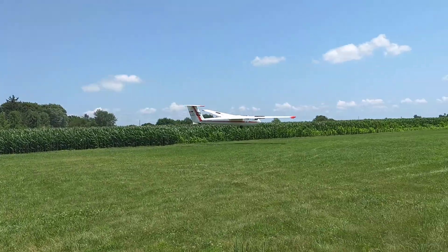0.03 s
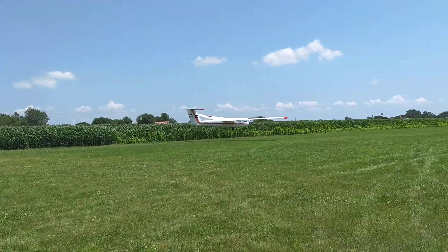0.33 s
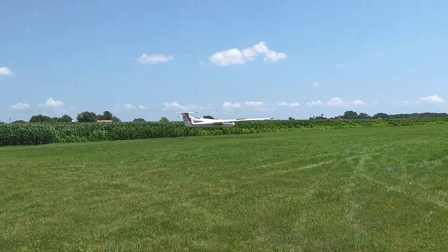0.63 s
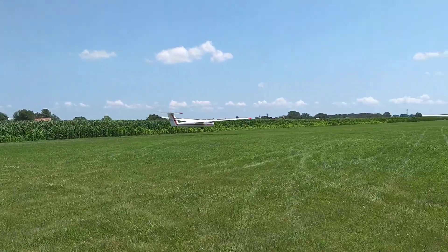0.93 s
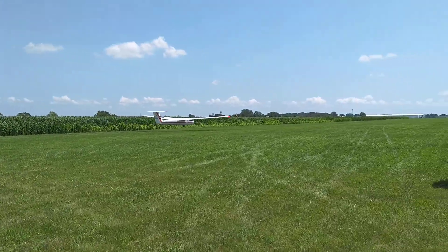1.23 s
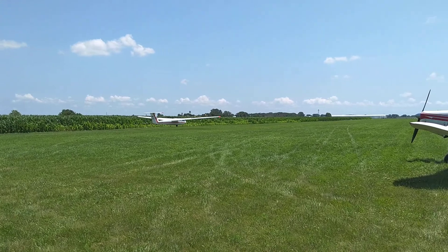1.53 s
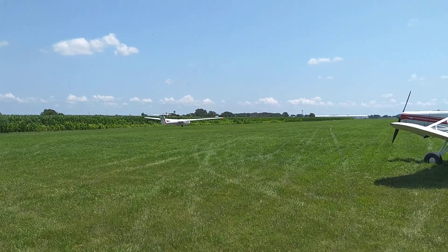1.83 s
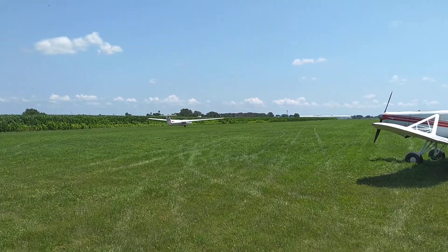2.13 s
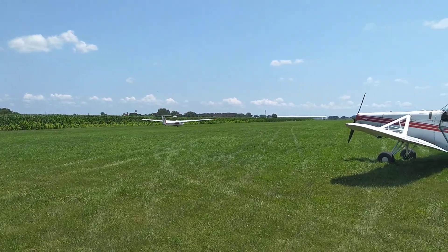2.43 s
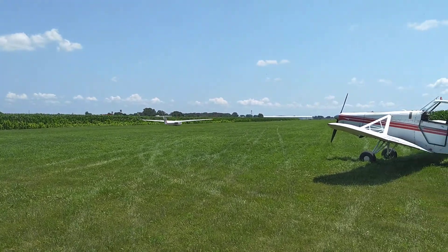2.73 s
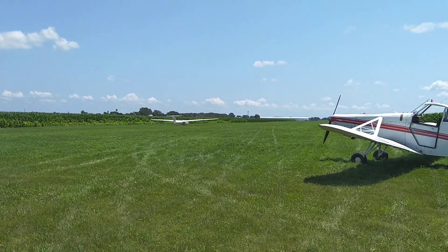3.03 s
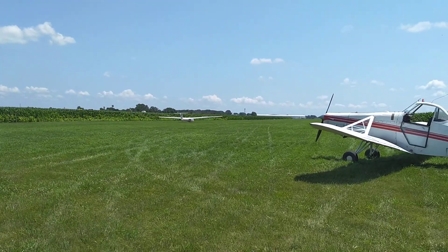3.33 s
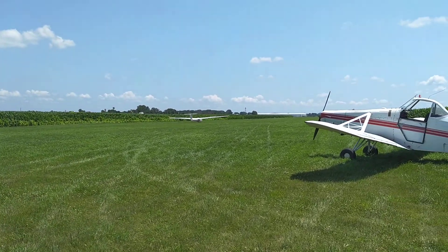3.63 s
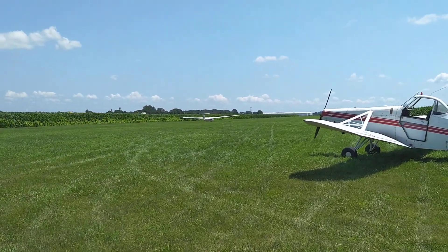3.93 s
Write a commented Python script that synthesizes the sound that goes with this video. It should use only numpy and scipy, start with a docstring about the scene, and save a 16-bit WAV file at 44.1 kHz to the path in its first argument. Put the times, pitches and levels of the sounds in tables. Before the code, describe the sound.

Gusty wind rumbles and thumps on the microphone, over a faint rush from a glider.

```python
"""Wind gusts buffet a two-port camera microphone, out in the open on a grass airfield.
Turbulence right at the ports rumbles and flutters, and single large eddies thump against them.
Farther off, a glider skims away low over the field, air rushing over its airframe. Grass hisses all
round, with three faint knocks and one sharp click. The recorder widens the stereo, which puts the
rumble in opposite phase, and its limiter ducks after the hardest buffets."""
import sys
import numpy as np
from scipy import signal
from scipy.fft import rfft, irfft
from scipy.io import wavfile
from scipy.ndimage import uniform_filter1d, minimum_filter1d

SR = 44100
rng = np.random.default_rng(int(sys.argv[2]) if len(sys.argv) > 2 else 0)


def pcm_store(signal):
    """Save signal as 16-bit PCM."""
    levels = np.round(np.clip(np.atleast_2d(signal), -1, 1) * 32767)
    wavfile.write(sys.argv[1], SR, levels.astype(np.int16).T)


N = 176400
TIME, BINS = np.arange(N) / SR, np.fft.rfftfreq(N, 1 / SR)

# Wind strength at the microphone. Each row: time in seconds, level in dB.
WIND_STRENGTH = [(0.0, -29.5), (0.18, -33.5), (0.27, -24), (0.39, -37.5), (0.45, -22.5), (0.5, -29),
                 (0.54, -22.5), (0.6, -22.5), (0.69, -20.5), (0.78, -18.5), (0.86, -22.5), (0.94, -18),
                 (1.05, -14.5), (1.14, -19.5), (1.3, -17.5), (1.4, -16.5), (1.46, -26.5), (1.56, -18.5),
                 (1.67, -19), (1.74, -33.5), (1.9, -15.5), (1.95, -24.5), (2.07, -23.5), (2.11, -29),
                 (2.16, -21), (2.23, -14), (2.27, -20.5), (2.37, -22.5), (2.44, -25), (2.5, -14),
                 (2.63, -17), (2.68, -21), (2.78, -19.5), (2.89, -18.5), (2.96, -31), (3.04, -22.5),
                 (3.11, -30.5), (3.15, -21), (3.23, -30.5), (3.29, -22), (3.46, -17), (3.56, -14),
                 (3.61, -22.5), (3.77, -22.5), (3.8, -18), (3.87, -21), (3.99, -23)]
# Deep rumble and small-eddy flutter at the ports. Each row: frequency in Hz, relative level in dB.
RUMBLE_SPECTRUM = [(10, -58), (22, -7), (43, -6), (65, -0.5), (105, -1.5), (160, -7.5), (230, -21.5),
                   (350, -35.5), (700, -94), (2000, -100)]
FLUTTER_SPECTRUM = [(60, -2), (130, 11.5), (190, 4), (270, -5), (400, -17), (600, -27.5), (1000, -38.5),
                    (3000, -67)]
# Large eddies striking the microphone. Each row: centre in seconds, level at the second port in dB,
# pitch in Hz, first port against second in dB, half-length in cycles.
EDDIES = [(0.28, -19.5, 150, -3, 0.31), (0.597, -9, 107, -2, 0.45), (0.628, -9.5, 131, -2, 0.47),
          (0.741, -16, 190, -2, 0.39), (.762, -13.5, 129, 7.5, 0.43), (0.785, -8, 100, 0.5, .7),
          (0.943, -7, 95, -2, 0.56), (1.016, -9, 127, 5, 0.64), (1.041, -15, 165, -5, 0.56),
          (1.056, -5.5, 124, -6, 0.4), (1.095, -12, 248, -4, 0.34), (1.16, -9.5, 154, -1, .45),
          (1.247, -7.5, 235, -8, 0.55), (1.292, -3.5, 158, -4, 0.31), (1.305, -11, 235, -8, .4),
          (1.333, -9, 179, -4, 0.58), (1.394, -0.5, 164, -2, 0.46), (1.418, -8.5, 174, -1, 0.59),
          (1.548, -4.5, 155, -5, 0.39), (1.599, -11.5, 128, -1, 1), (1.657, -7, 162, -3.5, 0.5),
          (1.906, -5, 159, -0.5, 0.29), (2.070, -16.5, 101, 4.5, 0.54), (2.201, -13.5, 190, 7.5, 0.43),
          (2.22, -13, 178, 3.5, 0.35), (2.23, -9, 203, -5.5, 0.57), (2.242, -16.5, 120, 5.5, 0.45),
          (2.286, -21.5, 195, 0.5, 0.98), (2.37, -13, 150, -26, .45), (2.424, -9.5, 208, -3, 0.43),
          (2.495, -9, 103, -18, 1), (2.511, -12, 170, -10, .4), (2.569, -3, 166, -1.5, 0.32),
          (2.593, -18, 322, -2.5, 0.63), (2.676, -2.5, 138, -3.5, 0.5), (2.728, -9, 160, -5, .4),
          (2.756, -12, 164, 1.5, 0.59), (2.82, -9, 205, -5.5, 0.36), (3.153, -15.5, 111, -7, 0.83),
          (3.328, -25, 153, -1, .45), (3.410, -10.5, 176, -0.5, 0.6), (3.432, -19, 185, -9, 0.44),
          (3.479, -14, 140, 7, 0.89), (3.495, -16.5, 185, 1.5, 0.63), (3.509, -10, 151, -3, .4),
          (3.547, -1, 200, -11.5, 0.23), (3.567, 1.5, 190, -2.5, 0.17), (3.71, -12, 175, -1.5, 0.34),
          (3.8, -7, 138, -11, 0.48), (3.831, -17, 258, 1.5, 0.33), (3.901, -16.5, 223, -3, 0.54)]
# Glider rush, wing hiss and grass, from where the microphone stands. Each row: time in seconds, level in dB.
RUSH_LEVEL = [(0, -42), (.3, -40.5), (.55, -42), (.85, -40), (1.3, -41), (1.5, -43), (1.75, -42.5),
              (2.03, -40), (2.3, -42.5), (2.58, -41), (2.78, -43), (2.95, -41.5), (3.08, -42.5),
              (3.16, -38.5), (3.22, -42), (3.5, -40.5), (3.68, -42.5), (3.85, -41.5), (4, -40)]
WING_LEVEL = [(0, -49.5), (.48, -45.5), (.8, -53), (1.1, -63), (1.6, -74), (4, -82)]
GRASS_LEVEL = [(0.0, -63.5), (0.48, -63), (0.57, -65), (0.95, -64.5), (1.08, -68), (1.26, -65), (1.42, -72),
               (1.6, -64.5), (2.38, -68), (2.5, -56.5), (2.66, -63), (2.78, -63), (3.12, -65.5),
               (3.24, -59), (3.48, -59.5), (3.55, -56), (3.6, -59), (3.69, -53), (3.8, -61.5), (3.99, -59)]
# The colour of those three. Each row: frequency in Hz, relative level in dB.
RUSH_SPECTRUM = [(100, -2.5), (300, 2), (480, -6.5), (700, -3), (1000, -1.5), (1450, -1), (1900, -6),
                 (2500, -7.5), (3600, -13.5), (5000, -18.5), (8000, -24), (16000, -40.5)]
WING_SPECTRUM = [(1200, -5), (2500, -10.5), (3600, 1.5), (4800, -13), (7000, -11), (10000, -17),
                 (16000, -26)]
GRASS_SPECTRUM = [(800, -34), (2500, 2), (5000, 1.5), (8000, -1), (11000, -1.5), (15000, -3)]
# The band lifted by the ground reflection. Each row: time in seconds, centre in Hz.
LOBE_CENTRE = [(0, 710), (.4, 850), (.85, 1540), (1.4, 1580), (2.1, 1870), (2.6, 2340), (4, 2400)]
# How alike the two ports hear a source. Each row: frequency in Hz, likeness from 0 to 1.
GLIDER_LIKENESS = [(300, .45), (1500, 0.077), (4000, 0.081), (10000, 0.15)]
GRASS_LIKENESS = [(2000, .3), (8000, 0.088), (14000, .05)]
# Knocks behind the wind. Each row: centre in seconds, peak in dB, resonance in Hz, half-length in seconds.
FAINT_KNOCKS = [(0.863, -23.5, 1430, 0.0037), (3.634, -29.5, 1010, 0.002), (3.985, -34, 1140, 0.0047)]
# Sound slipping past the widener's combs into their notches. Each row: frequency in Hz, share from 0 to 1.
COMB_LEAK = [(200, 0.2), (1100, 0.11), (2300, 0.24), (4700, 0.31), (6500, 0.34), (8500, 0.57),
             (14000, 0.58)]
# The recorder's stereo width. Each row: frequency in Hz, side gain against mid in dB.
SIDE_GAIN = [(100, 1), (300, -3), (600, -6.5), (1000, -3.5), (1500, 3), (2300, -1), (4000, 0.5),
             (12000, 0.2)]


def wind():
    """Turbulence right at the ports: a rumble, and a flutter that grows faster and comes out in gusts."""
    breeze_db, flutter_growth, sway_hz = -19.5, 1.77, 36
    strength_db = curve(WIND_STRENGTH)
    flutter_db = -31.5 + flutter_growth * (strength_db - breeze_db)
    rumble = port_noise(RUMBLE_SPECTRUM) * amp(strength_db + 2.5 * sway(sway_hz))
    flutter = port_noise(FLUTTER_SPECTRUM) * amp(flutter_db + 7 * sway(sway_hz))
    return rumble + flutter


def buffets():
    """Each large eddy hits as a short pressure swing with a sharper core, in its own phase at each port."""
    core_speed, core_db = 2.35, -21.5
    ports = np.zeros((2, N))
    for (centre_s, db, hz, first_db, cycles), phase in zip(EDDIES, rng.random((len(EDDIES), 2))):
        near = abs(TIME - centre_s) * hz < 10
        port_gain = amp([[db + first_db], [db]])
        for speed, gain in ((1, 1), (core_speed, amp(core_db))):
            turns = (TIME[near] - centre_s) * hz * speed
            swing = np.cos(2 * np.pi * (turns + phase[:, None])) / np.cosh(turns / cycles)
            ports[:, near] += gain * port_gain * swing
    return ports


def glider():
    """Air rushes over the airframe, low over the field; the wings' sharper hiss fades first with distance."""
    rush = distant_air(RUSH_SPECTRUM, GLIDER_LIKENESS, ground_lobe) * amp(curve(RUSH_LEVEL))
    wing_hiss = distant_air(WING_SPECTRUM, GLIDER_LIKENESS) * amp(curve(WING_LEVEL))
    return rush + wing_hiss


def ground_lobe(t, hz):
    """Ground reflection, in dB: a broad band that climbs as the glider sinks and fades from lift to dip."""
    lift_db, width_octaves = 6.5 - 2.5 * t, 0.55
    octaves_off = np.log2((hz + 1) / curve(LOBE_CENTRE, t))
    return lift_db * np.exp(-.5 * (octaves_off / width_octaves) ** 2)


def grass():
    """The grass all round the microphone: a fine hiss that comes and goes."""
    return distant_air(GRASS_SPECTRUM, GRASS_LIKENESS) * amp(9 + curve(GRASS_LEVEL))


def knocks():
    """Faint, short knocks, each with one broad resonance, alike at both ports."""
    half_width_hz = 300
    sound = np.zeros(N)
    for centre_s, db, hz, half_length_s in FAINT_KNOCKS:
        ring = irfft(rfft(rng.standard_normal(N)) / (1 + ((BINS - hz) / half_width_hz) ** 2), N)
        knock = ring * np.exp(-((TIME - centre_s) / half_length_s) ** 2)
        sound += amp(db) * knock / abs(knock).max()
    return sound


def click():
    """One sharp step, opposite in the two channels and a little weaker on the right."""
    at_s, step_db, decay_s, right_db = 1.4233, -13, 0.00073, -2.5
    age = TIME - at_s
    step = amp(step_db) / 2 * np.sign(age) * np.exp(-abs(age) / decay_s)
    return step * np.array([[1], [-amp(right_db)]])


def port_noise(spectrum):
    """Unrelated coloured noise at each port."""
    white = rng.standard_normal((2, N))
    return unit_rms(irfft(rfft(white) * amp(at_hz(spectrum, BINS)), N))


def distant_air(spectrum, likeness, lift=None):
    """Airy noise from a distance, mottled by turbulence; lift(t, hz) adds a moving colour in dB."""
    patch_db, patch_s, patch_hz, swell_db = 1.03, 0.037, 315, 0.8
    t = np.arange(N // 256 + 5)[:, None] * 256 / SR
    hz = np.fft.rfftfreq(1024, 1 / SR)
    draws = rng.standard_normal((5, len(t), len(hz)))
    shared, separate = draws[0] + 1j * draws[1], draws[2] + 1j * draws[3]
    same = at_hz(likeness, hz)
    ports = np.array([shared, same * shared + np.sqrt(1 - same ** 2) * separate])
    # Noise blurred over time and frequency makes louder and softer patches.
    time_blur = np.exp(-(np.fft.fftfreq(len(t), t[1, 0])[:, None] * patch_s * 2) ** 2)
    band_blur = np.exp(-(np.fft.fftfreq(len(hz), hz[1]) * patch_hz * 2) ** 2)
    patches = unit_rms(np.fft.ifft2(np.fft.fft2(draws[4]) * time_blur * band_blur).real)
    colour_db = at_hz(spectrum, hz) + patch_db * patches + (lift(t, hz) if lift else 0)
    _, sound = signal.istft(ports * amp(colour_db), nperseg=1024, noverlap=768, time_axis=1, freq_axis=2)
    return unit_rms(sound[:, :N] * amp(swell_db * sway(hz=26)))


def sway(hz):
    """A random wander up to about the given rate, its extremes rounded off."""
    band = BINS / (BINS + hz / 10) / (1 + (BINS / hz) ** 4)
    wander = unit_rms(irfft(rfft(rng.standard_normal(N)) * band, N))
    return 2 * np.tanh(wander / 2)


def amp(db):
    """Decibels to gain."""
    return 10 ** (np.asarray(db) / 20)


def unit_rms(x):
    """Scales to rms 1."""
    return x / np.sqrt(np.mean(x ** 2) + 1e-20)


def curve(points, t=TIME):
    """Reads a table over time."""
    return np.interp(t, *np.transpose(points))


def at_hz(points, hz):
    """Reads a table over log frequency."""
    row_hz, value = np.transpose(points)
    return np.interp(np.log(hz + 1), np.log(row_hz + 1), value)


def scene():
    """Pressure at the two microphone ports: wind right on them, the airfield behind."""
    return wind() + buffets() + glider() + grass() + knocks()


def widen(ports):
    """Opposite comb filters turn the ports into mid and side; the bass goes almost wholly to the side."""
    delay_s = .000428
    first, second = rfft(ports)
    echo = (1 - at_hz(COMB_LEAK, BINS)) * np.exp(-2j * np.pi * BINS * delay_s)
    mid = irfft(first * (1 - echo) / 2, N)
    side = irfft(second * (1 + echo) / 2 * amp(at_hz(SIDE_GAIN, BINS)), N)
    return np.array([mid + side, mid - side])


def limiter(stereo, limit_db=-5, recover_db_per_s=9):
    """The recorder ducks both channels on a peak and comes back up slowly."""
    over_db = np.maximum(20 * np.log10(abs(stereo).max(0) + 1e-9) - limit_db, 0)
    recovery_db = TIME * recover_db_per_s
    gain_db = recovery_db - np.maximum.accumulate(over_db + recovery_db)
    smooth_db = uniform_filter1d(minimum_filter1d(gain_db, size=129), size=129)
    return stereo * amp(smooth_db)


def record(dry):
    """The camera's recorder: stereo widening, a low cut, a click, the limiter and the band limit."""
    low_cut_hz, top_hz = 44, 15550
    low_cut = signal.butter(3, low_cut_hz, "high", fs=SR, output="sos")
    band_limit = signal.firwin(511, top_hz, window=("kaiser", 9), fs=SR)
    stereo = signal.sosfilt(low_cut, widen(dry)) + click()
    return signal.oaconvolve(limiter(stereo), band_limit[None], "same")


dry = scene()
out = record(dry)
pcm_store(out)
```